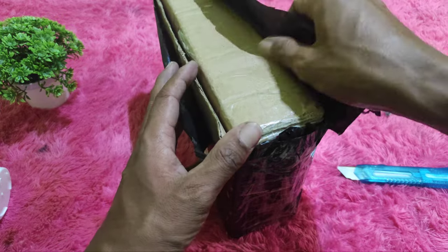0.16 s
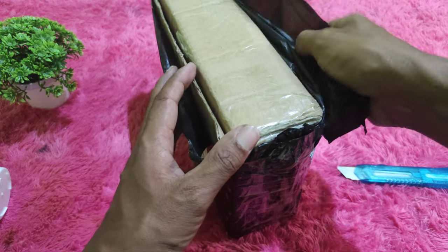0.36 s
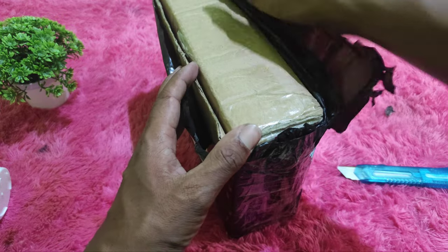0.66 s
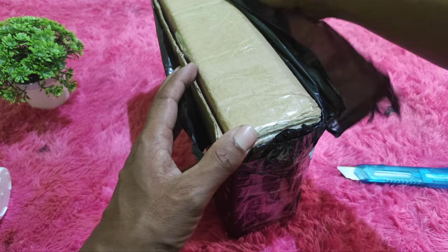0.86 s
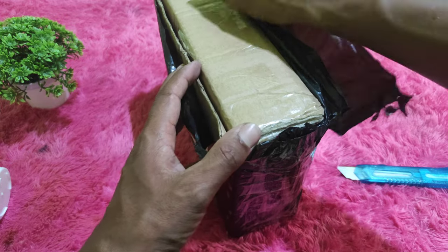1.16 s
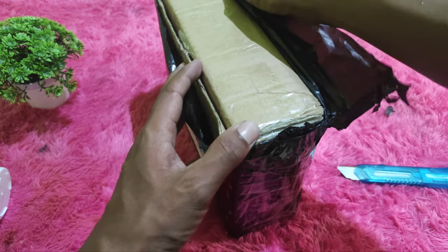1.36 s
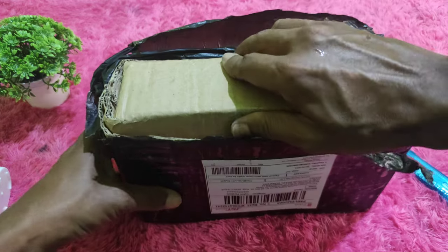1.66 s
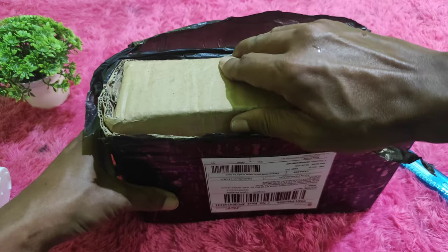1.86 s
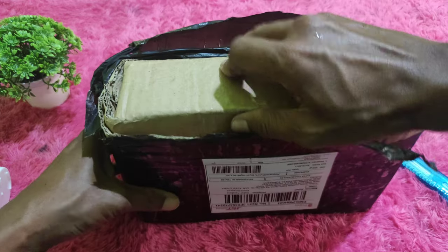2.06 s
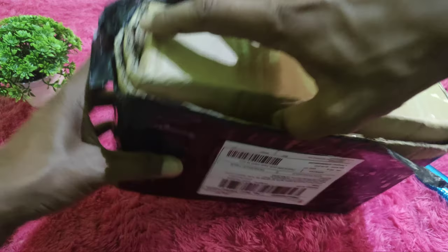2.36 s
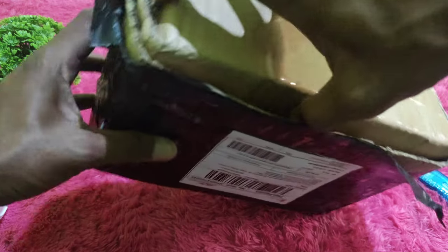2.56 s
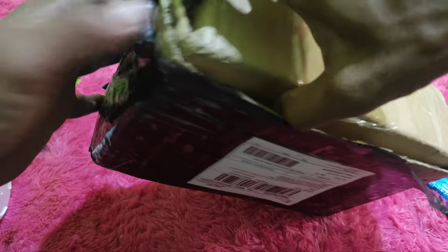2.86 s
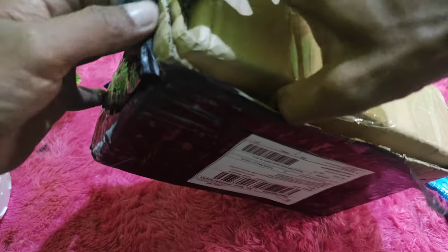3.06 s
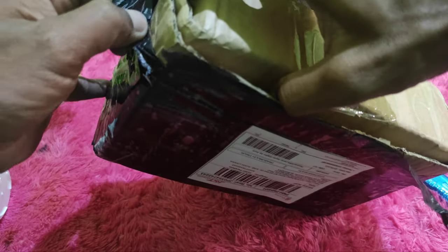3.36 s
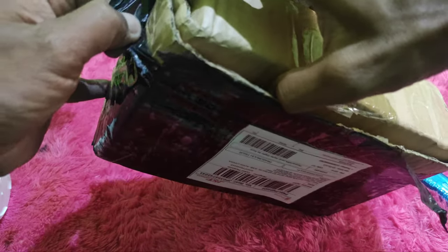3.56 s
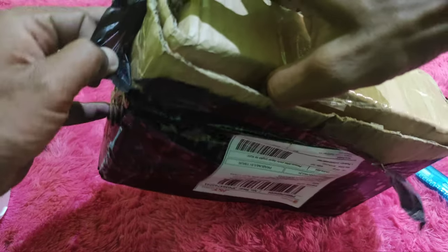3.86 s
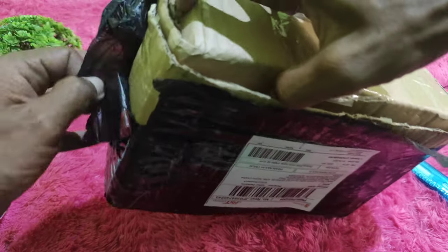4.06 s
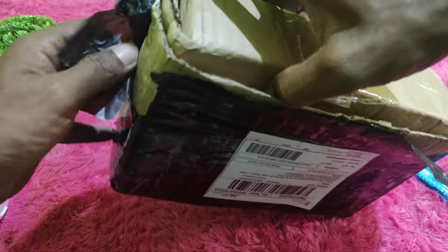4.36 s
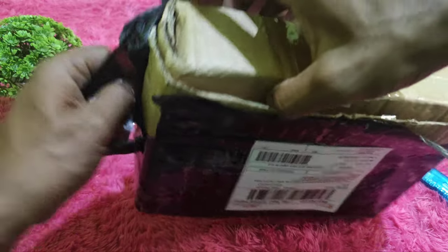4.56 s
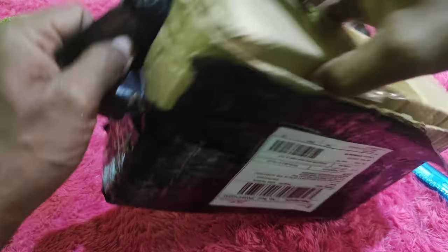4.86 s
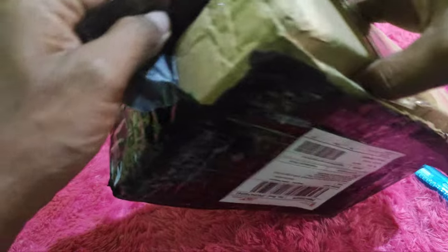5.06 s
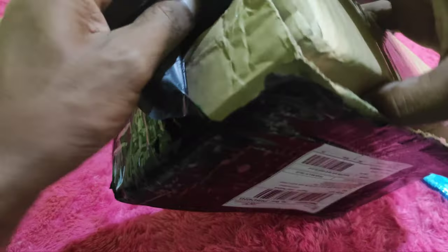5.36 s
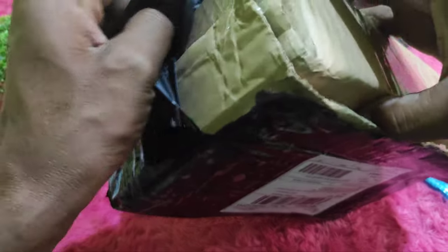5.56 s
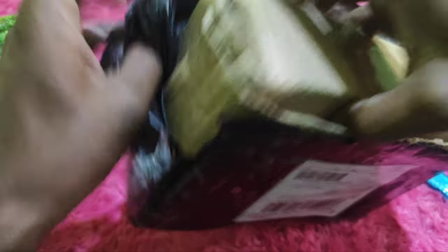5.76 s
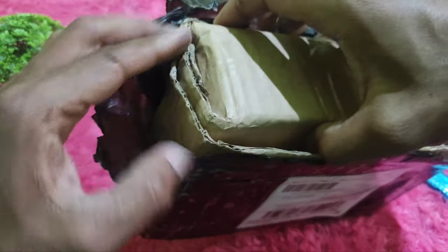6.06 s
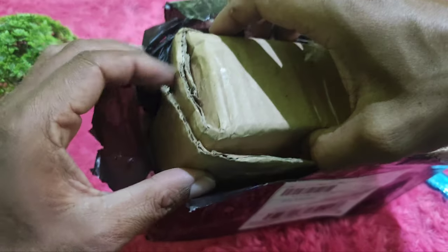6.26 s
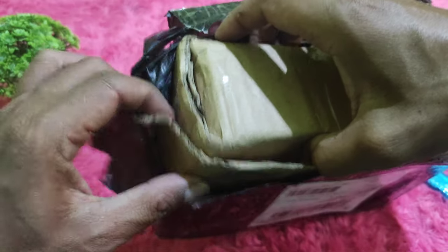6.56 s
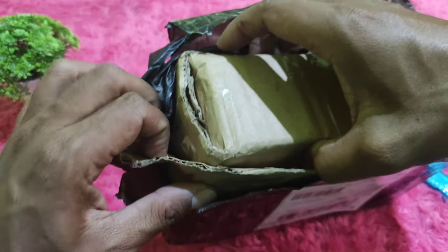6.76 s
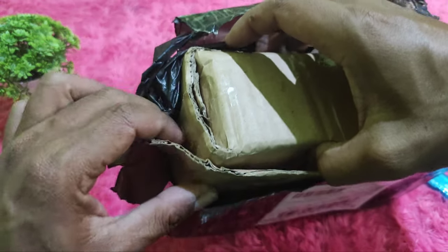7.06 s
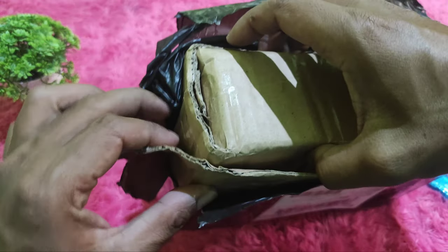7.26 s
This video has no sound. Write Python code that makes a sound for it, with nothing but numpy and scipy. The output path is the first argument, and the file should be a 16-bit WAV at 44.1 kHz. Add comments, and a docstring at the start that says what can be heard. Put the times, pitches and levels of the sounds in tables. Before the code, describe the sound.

Close, bright plastic crackle and loud crease snaps as a parcel is unwrapped, cardboard thumping and rubbing underneath, a faint motor droning far off.

```python
"""In a small room, close to the microphone, hands peel a plastic mailing bag off a taped cardboard box.
The film crackles in swarms of random clicks and single loud snaps, each click or crease shaking the sheet.
The box rumbles as knocks and rubbing fingers ring its low modes; a far motor drones as a few sine waves.
Filtered noise makes the rush of the room. The right microphone port rings in the treble and overloads,
the left one is muffled. The sound drops out briefly once."""
import sys
import numpy as np
from scipy import signal
from scipy.fft import rfft, irfft
from scipy.io import wavfile
from scipy.ndimage import uniform_filter1d

SR = 44100
rng = np.random.default_rng(int(sys.argv[2]) if len(sys.argv) > 2 else 0)


def transcribe(signal):
    """Save signal, clipped to [-1, 1], as a 16-bit WAV file at the path in sys.argv[1]."""
    frames = np.atleast_2d(signal).T
    limited = np.clip(frames, -1, 1)
    pcm = np.round(limited * 32767).astype(np.int16)
    wavfile.write(sys.argv[1], SR, pcm)


N = 326340
TIME = np.arange(N) / SR  # seconds

# All table levels are relative: the functions below add gains of their own.
# room background spectrum: (frequency [Hz], level per Hz [dB])
AIR_SPECTRUM = [(22, 7.5), (45, 4), (90, -3.5), (130, -2.5), (220, -3.5), (400, -5), (800, -10),
                (2000, -17.5), (6000, -20.5), (15000, -51)]
# distant motor: (time [s], firing rate [per s], level [dB], pitch that booms most [Hz])
MOTOR_COURSE = [(0, 26.8, -56.5, 82), (1.4, 31, -48.5, 82), (1.6, 30.3, -38, 71), (2.05, 30.3, -48, 67.6),
                (2.9, 31, -40.5, 90), (3.2, 30, -40.5, 155), (3.8, 28.4, -46, 123), (4.6, 31.5, -45.5, 169),
                (5.1, 31.6, -44.5, 170), (5.7, 31.2, -47.5, 162), (6.15, 31.3, -40.5, 148),
                (6.9, 29.4, -49, 88), (7.4, 26, -46, 88)]
# overtones of the motor: (multiple of the firing rate [-], level [dB])
MOTOR_ORDERS = [(2, 0), (3, -5.5), (4, -18.5), (5, -8.5), (6, -9), (7, -2.5)]
# how hard the holding hand presses, as its rub on the box: (time [s], level [dB])
HAND_GRIP = [(0, -43.5), (1.3, -41.5), (1.8, -39.5), (2.1, -41.5), (2.6, -47), (2.98, -38), (3.3, -50.5),
             (3.72, -53), (3.83, -40.5), (4.4, -46), (5.1, -44), (5.8, -47.5), (6.4, -47.5), (7.4, -48)]
# fingers knocking the box: (time [s], level [dB], pitch stirred most [Hz])
FINGER_KNOCKS = [(0.466, -25, 270), (1.576, -19.5, 242), (1.665, -19.5, 290), (1.775, -23.5, 266),
                 (2.332, -20.5, 302), (2.745, -21.5, 343), (2.879, -25, 320), (2.937, -19.5, 288),
                 (3.001, -19, 290), (3.324, -30, 400), (4.075, -16, 180), (5.652, -24.5, 280),
                 (5.88, -29, 328), (5.96, -24, 300), (6.2, -33, 190), (6.616, -25.5, 355),
                 (6.671, -16, 377), (6.717, -20.5, 340)]
# ringing modes of the box and the air inside: (pitch [Hz], level [dB], time to fade by 60 dB [s])
BOX_MODES = [(176, -6, .1), (204, -7, .08), (245, -1, .14), (277, -2, .15), (299, -4, .12),
             (328, -1.5, .17), (374, -.5, .12), (450, -8, .05), (535, -3, .06), (597, -5, .06)]
# creases that snap through: (time [s], level [dB], pitch of the fold [Hz], fold against crack [dB])
CREASE_SNAPS = [(0.195, -21, 1980, -16), (0.2677, -12, 2600, -9.5), (0.4402, -9, 4300, -32),
                (.455, -16, 4450, -25), (.6537, -12.5, 3780, -20), (0.94, -5, 1080, -25),
                (1.1213, -11.5, 2380, -17), (1.1349, -22.5, 2810, 0), (1.2306, -17, 2130, -12),
                (1.5725, -4.5, 1210, -12.5), (1.631, -7, 3510, -33), (1.6571, -18, 1620, 5),
                (1.6654, -18.5, 2220, 0), (1.7749, -3.5, 1020, -13.5), (2.288, -4, 3870, -28),
                (2.3014, -4, 4540, -25), (2.315, -5, 2710, -26), (2.331, -6, 3520, -15),
                (2.3492, -1.5, 2470, -12), (2.496, -14.5, 2650, -36), (2.583, -13.5, 4440, -31),
                (2.617, -9, 2180, -19), (2.7328, -19.5, 4300, -11), (2.7918, -25.5, 4350, 1),
                (3.1772, -14.5, 2400, -14), (3.191, -17, 2260, -8), (3.208, -26, 2200, -1),
                (3.2571, -12, 3380, -30), (3.264, -19.5, 2400, -6.5), (3.2786, -1.5, 2430, -28),
                (3.3056, -23, 2410, -8), (3.3272, -8.5, 2850, -10.5), (3.3876, -5.5, 3200, -18),
                (3.411, -23, 2380, -6), (3.4602, -19, 4400, -14), (3.594, -20, 3540, -30),
                (4.0612, -1, 2540, -12), (4.0755, -4, 2530, -13), (4.0869, -1, 2130, -5),
                (4.4105, -14, 4470, -28), (4.5344, -34, 2180, 5.5), (4.5531, -22.5, 2560, -6.5),
                (4.6097, -9, 2490, -40), (4.7619, -3, 2580, -10), (4.8529, -9, 2710, -13.5),
                (4.9489, -23.5, 1220, 0.5), (4.966, -10, 1154, -20), (5.1601, -32, 2150, 2.5),
                (5.2169, -27.5, 4450, -7), (5.326, -10, 3200, -12), (5.341, -8, 3730, -22.5),
                (5.3508, -12.5, 3200, -10), (5.443, -12, 3290, -10), (5.478, -7.5, 2430, -17),
                (5.513, -9.5, 2480, -13), (5.528, -14, 4500, -14), (5.551, -4, 3910, -30),
                (5.6226, -22, 3620, 1.5), (5.6337, -13.5, 3050, -15), (5.857, -19.5, 2355, -16),
                (5.878, -9, 1240, -22), (6.046, -8, 4325, -40), (6.209, -16.5, 4340, -16),
                (6.2306, -10, 2996, -26), (6.2429, -10, 2860, -10.5), (6.294, -13, 2780, -24),
                (6.3012, -13, 2670, -29), (6.353, -29, 2290, -3), (6.3971, -9.5, 3630, -30),
                (6.4242, -12, 4500, -32), (6.532, -15.5, 4000, -4.5), (6.5444, -21.5, 3230, -4),
                (6.6691, -6, 2590, -15), (6.7543, -3.5, 3690, -38), (6.7964, -13.5, 2270, -16),
                (6.8312, -11.5, 2240, -30), (6.9428, -8, 2800, -17), (7.195, -22, 1042, -26),
                (7.3222, -13.5, 2600, -33), (7.363, -13, 2300, -21)]
# pulls on the film: (hardest moment [s], crinkle level [dB], build-up [s], let-go [s],
#                     broad folds against crinkle [dB])
FILM_PULLS = [(.04, -30, 0.26, 0.12, -10.5), (.2, -29.5, 0.041, 0.035, -5.5),
              (0.263, -23.5, 0.039, 0.31, -11.5), (0.466, -18, 0.036, 0.027, -15.5),
              (.65, -27.5, 0.082, 0.11, -10), (.94, -22.5, 0.16, 0.051, -11.5),
              (1.127, -32, 0.19, 0.14, -5), (1.343, -23, 0.013, 0.15, -7.5),
              (1.411, -22, 0.025, 0.063, -17), (1.627, -20, .07, 0.088, -8.5),
              (2.3, -23, 0.042, 0.088, -11.5), (2.42, -26.5, 0.05, 0.083, -11.5),
              (2.859, -31.5, 0.14, 0.056, -7), (2.946, -24, 0.032, 0.067, -11),
              (3.188, -28, 0.035, 0.036, -14), (3.271, -35, 0.039, 0.25, -14), (3.5, -45, 0.098, .05, 1),
              (3.832, -22, 0.028, 0.053, -16), (3.96, -34.5, 0.075, 0.075, -7.5),
              (4.085, -17.5, 0.025, 0.02, -10), (4.347, -31, .012, 0.084, -14.5),
              (4.495, -31.5, 0.023, 0.026, -15), (4.56, -36.5, .015, 0.18, -7.5),
              (4.768, -32, 0.0068, 0.11, -7), (4.97, -38.5, 0.035, .05, -6), (5.311, -24, 0.056, .035, -13),
              (5.521, -24, 0.12, 0.17, -13.5), (5.645, -27, 0.08, 0.064, -13),
              (5.746, -28, 0.056, 0.022, -10), (5.876, -16, 0.015, 0.038, -12),
              (5.96, -28, 0.047, 0.081, -11), (6.045, -28.5, 0.062, 0.08, -14),
              (6.238, -24.5, 0.03, .025, -21), (6.3, -30.5, 0.05, 0.029, -16),
              (6.402, -24.5, 0.03, 0.077, -20.5), (6.54, -22.5, 0.052, 0.091, -16),
              (6.669, -21, 0.029, 0.049, -13), (6.758, -24.5, .06, 0.057, -15.5),
              (6.96, -30.5, 0.13, 0.053, -16), (7.025, -31, 0.021, 0.019, -13),
              (7.114, -30, 0.018, .055, -19), (7.253, -32, 0.026, 0.047, -27),
              (7.325, -28, .01, 0.23, -16.5)]
# spectrum of the fine crinkle: (frequency [Hz], level per Hz [dB])
CRINKLE_SPECTRUM = [(1500, -10), (3000, -0.5), (5000, -1.5), (6500, -2), (8400, -4.5), (10200, -4.5),
                    (12000, -19.5), (15000, -13.5)]
# spectrum of the broad folds: (frequency [Hz], level per Hz [dB])
FOLD_SPECTRUM = [(400, 0), (750, -2.5), (1150, 8), (1600, 2), (2400, 9.5), (3400, -8), (5000, -1.5),
                 (9000, -37)]
# resonances of the right microphone port: (pitch [Hz], width [Hz], boost of each alone [dB])
PORT_RESONANCES = [(7487, 160, 7), (7030, 1060, 12), (8170, 760, 9)]
# the drop-out: (time [s], level [dB])
DROPOUT_COURSE = [(1.42, 0), (1.445, -16), (1.49, -48), (1.495, -80), (1.546, -80), (1.549, 0)]

USUAL_GRIP_DB = -41
SLIDE_DB, SLIDE_S = -15.5, 0.084  # a finger slides on after each knock
DRAG_DB = -7  # the folds drag over the box as they move
PULL_ROUNDNESS = 1.35
SETTLE_DB, SETTLE_RISE_S, SETTLE_S = -16.5, 0.015, 0.095  # the film keeps rustling after each pull
SETTLE_FOLDS_DB = 9.5  # and sounds duller as it does
RESTING_DB, RESTING_FOLDS_DB = -42.5, -2.5  # film merely held: its crinkle, its folds against that
SHIVER_T60_S = 0.02  # time for the film's shiver to fade by 60 dB
CUTOFF_HZ = 15350  # almost nothing is heard above this


def from_db(db):
    """Turn decibels into a gain."""
    return 10 ** (np.asarray(db) / 20)


def rms_one(x):
    """Scale to an average strength (rms) of 1."""
    return x / np.sqrt(np.mean(x ** 2) + 1e-20)


def in_time(rows):
    """Read the columns of a time table at every sample."""
    s, *columns = np.transpose(rows)
    return [np.interp(TIME, s, column) for column in columns]


def at_hz(points, hz):
    """Read a spectrum table along a log-frequency axis."""
    table_hz, table_db = np.transpose(points)
    return np.interp(np.log(hz), np.log(table_hz), table_db)


def butter(x, hz, kind, order=2):
    """Keep low, high or middle frequencies with a Butterworth filter."""
    edges_hz = np.clip(hz, 10, 0.47 * SR)
    sos = signal.butter(order, edges_hz, kind, fs=SR, output="sos")
    return signal.sosfilt(sos, x + 1e-18)


def resonance(x, hz, width_hz):
    """Ring at one pitch, with gain 1 on top; a narrower width rings longer."""
    r = np.exp(-np.pi * width_hz / SR)
    feedback = [1, -2 * r * np.cos(2 * np.pi * hz / SR), r * r]
    return signal.lfilter(np.array([1, 0, -1]) * (1 - r * r) / 2, feedback, x + 1e-18)


def drift(rate):
    """Wander by chance with spread 1, taking a new random value `rate` times a second."""
    knots = rng.standard_normal(4000)
    wander = np.interp(TIME * rate, np.arange(len(knots)), knots)
    return wander * np.sqrt(3 / 2)  # joining the knots by lines narrows the spread


def swell(s, rise_s, fall_s, roundness=1.0):
    """Build up to gain 1 at moment s and die away; roundness above 1 blunts the top, shortens the skirts."""
    away = np.maximum((s - TIME) / rise_s, (TIME - s) / fall_s)
    near, gain = away < 12, np.zeros(N)
    gain[near] = np.exp(-away[near] ** roundness)
    return gain


def buckles(per_s, spread_db, top):
    """Random clicks, mostly small, a few large; power is evened over a few hundredths of a second."""
    sizes_db = spread_db * np.minimum(rng.exponential(1, N), top)
    sizes = from_db(sizes_db) * rng.choice([-1, 1], N)
    clicks = sizes * (rng.random(N) < per_s / SR)
    power = np.abs(uniform_filter1d(clicks ** 2, size=1500))
    return clicks / np.sqrt(power + 1e-3)


def background(level_db=-45, apart=0.61):
    """Steady low rush of the room: shaped noise, with a part that differs between the two sides."""
    hz = np.maximum(np.fft.rfftfreq(N, 1 / SR), 1)
    noise = rfft(rng.standard_normal((2, N)))
    mid, side = irfft(noise * from_db(at_hz(AIR_SPECTRUM, hz)), N)
    rush = mid + apart * side * np.array([[1], [-1]])
    return from_db(level_db) * rms_one(butter(rush, 25, "high"))


def motor(boom_db=9, boom_octaves=0.41):
    """Only low multiples of the firing rate come through the walls; they swell near a moving boom pitch."""
    per_s, level_db, boom_hz = in_time(MOTOR_COURSE)
    unsteady_per_s = per_s * (1 + 0.00676 * drift(10))
    turn = 2 * np.pi * np.cumsum(unsteady_per_s) / SR
    out = 0
    for multiple, db in MOTOR_ORDERS:
        k = round(multiple)
        octaves_off = np.log2(k * per_s / boom_hz)
        boom = boom_db * np.exp(-(octaves_off / boom_octaves) ** 2)
        gain = from_db(level_db + db + boom + 2.0 * drift(7.8))
        out = out + gain * np.sin(k * turn + rng.uniform(0, 2 * np.pi))
    return out


def rubbing(folds_db):
    """Strength of the rub on the box: the holding hand, the dragging folds and a slide after each knock."""
    hand = from_db(in_time(HAND_GRIP)[0]) ** 2
    drag = from_db(folds_db + DRAG_DB) ** 2
    slides = sum((from_db(db + SLIDE_DB) * swell(s, 0.018, SLIDE_S)) ** 2 for s, db, _ in FINGER_KNOCKS)
    return np.sqrt(hand + drag + slides)


def box(folds_db, knock_db=-7, octaves=0.83, rub_db=11, fingertip_hz=650):
    """Fingers knock, stick and slip on the cardboard and set its low modes ringing."""
    slips = buckles(500, spread_db=2.0, top=2.1) * rubbing(folds_db)
    s, level_db, stirred_hz = np.transpose(FINGER_KNOCKS)
    at = np.round(s * SR).astype(int)
    rings = 0
    for hz, db, t60 in BOX_MODES:
        width_hz = np.log(1000) / np.pi / t60
        # where a finger lands decides which modes it finds
        reach = np.exp(-(np.log2(hz / stirred_hz) / octaves) ** 2) * rng.choice([-1, 1], len(s))
        blows = np.zeros(N)
        # the last factor makes up for the small start of a narrow resonance
        blows[at] = from_db(level_db + knock_db) * reach * SR / (2 * np.pi * width_hz)
        # a soft fingertip takes the edge off each knock
        drive = butter(blows, fingertip_hz, "low") + from_db(23.0) * slips
        rings = from_db(db) * resonance(drive, hz, width_hz) - rings  # modes alternate in sign
    return rings + from_db(rub_db) * butter(slips, [170, 680], "band")


def snaps(crack_hz=6600, crack_width_hz=4200, fold_width_hz=1200, crack_db=-1, fold_db=13,
          travel_s=0.0004, stutter=0.88, stutter_s=0.00058, shiver=0.65, shiver_s=0.0021):
    """A crease flips: a bright crack and the short ring of its fold, then a stutter and a sheet shiver."""
    size = 1024  # samples per snap
    out, t, hz = np.zeros(N + size), np.arange(size) / SR, np.fft.rfftfreq(size, 1 / SR)
    grains = rng.standard_normal((len(CREASE_SNAPS), 2, size))
    # bending waves carry the highs across the sheet sooner than the lows
    flip = irfft(np.exp(-4j * np.pi * travel_s * np.sqrt(hz * crack_hz)))
    for (s, level_db, fold_hz, fold_rel_db), grain in zip(CREASE_SNAPS, grains):
        stutters = stutter * rms_one(grain[0] * t * np.exp(-2 * t / stutter_s))
        shivers = shiver * rms_one(grain[1] * np.sqrt(t) * np.exp(-t / shiver_s))
        drive = flip + (stutters + shivers) / np.sqrt(size)
        crack = resonance(drive, crack_hz, crack_width_hz)
        fold = resonance(drive, fold_hz, fold_width_hz)
        snap = from_db(crack_db) * crack / np.abs(crack).max()
        snap = snap + from_db(fold_db + fold_rel_db) * fold / np.abs(fold).max()
        at = max(round(s * SR), 0)
        out[at:at + size] += from_db(level_db) * snap
    return out[:N]


def handling():
    """Levels of crinkle and folds [dB]: pulls swell, let go and settle over the rustle of the held film."""
    # powers are added up, hence the squares
    crinkle = from_db(RESTING_DB + in_time(HAND_GRIP)[0] - USUAL_GRIP_DB) ** 2
    folds = crinkle * from_db(RESTING_FOLDS_DB) ** 2
    for s, db, rise_s, fall_s, folds_rel_db in FILM_PULLS:
        pull = (from_db(db) * swell(s, rise_s, fall_s, PULL_ROUNDNESS)) ** 2
        settle = (from_db(db + SETTLE_DB) * swell(s, SETTLE_RISE_S, SETTLE_S)) ** 2
        crinkle = crinkle + pull + settle
        duller = pull + settle * from_db(SETTLE_FOLDS_DB) ** 2
        folds = folds + duller * from_db(folds_rel_db) ** 2
    return 10 * np.log10(crinkle), 10 * np.log10(folds)


def scatter(clicks, t60):
    """Draw each click out into a brief random shiver of the same energy."""
    r = from_db(-120 / (t60 * SR))  # power decay per sample
    power = signal.lfilter([1 - r], [1, -r], clicks ** 2 + 1e-18)
    return np.sqrt(power) * rng.standard_normal(N)


def facets(clicks, spectrum, variety_db=5.0, shiver=1.0):
    """Each buckle shakes facets of many sizes, each with its own strength; the sheet shivers on."""
    edges_hz, at = np.geomspace(350, 17000, num=15), np.flatnonzero(clicks)
    out = 0
    for low, high in zip(edges_hz, edges_hz[1:]):
        strength = from_db(variety_db * np.clip(rng.standard_normal(N)[at], -2, 2))
        blows = np.zeros(N)
        blows[at] = clicks[at] * strength * np.sign(rng.random(N)[at] - 0.5)
        shaken = blows + shiver * scatter(blows, SHIVER_T60_S)
        band_gain = from_db(at_hz(spectrum, np.sqrt(low * high)))
        out = out + band_gain * butter(shaken, [low, high], "band")
    return rms_one(out)


def film(crinkle_db, folds_db, back_share=0.32, front_share=0.053):
    """A harder pull brings more buckles a second; they come in clumps and move the broad folds around them."""
    per_s = 1300 * from_db(0.4 * (crinkle_db + 32.5))
    fine = buckles(per_s, spread_db=2.5, top=2.4) * from_db(1.3 * drift(110))
    # now and then a stiffer wrinkle gives way and stands out of the swarm
    stiff = 21 * rng.uniform(0.39, 1.14, N) * (rng.random(N) < 36 / SR)
    clicks = fine + stiff
    crinkle = from_db(crinkle_db - 3.5) * facets(clicks, CRINKLE_SPECTRUM)
    # the two faces of the sheet radiate unlike patterns
    front = from_db(folds_db + 5.5) * facets(clicks, FOLD_SPECTRUM)
    back = from_db(folds_db + 5.5) * facets(clicks, FOLD_SPECTRUM)
    left = 0.85 * crinkle + back_share * back + front_share * front
    return np.array([left, crinkle + front])


def room(x, room_db=-15, t60=0.39):
    """Echoes off the walls: a short tail of fading noise, different at each port."""
    t = np.arange(SR // 2) / SR
    fading = rng.standard_normal((2, len(t))) * from_db(-60 * t / t60) * (t > 0.004)
    tail = rms_one(fading) / np.sqrt(len(t))
    return x + from_db(room_db) * signal.fftconvolve(x, tail, axes=1)[:, :N]


def scene():
    """The parcel with its room echo, over the motor and the background; gain pairs are left, right."""
    crinkle_db, folds_db = handling()
    parcel = film(crinkle_db, folds_db)
    parcel = parcel + snaps() * from_db([[-5], [1]])
    parcel = parcel + box(folds_db) * from_db([[-2], [0]])
    far = motor() * from_db([[-4], [-2]]) + background() * from_db([[-1], [1]])
    return room(parcel) + far


def record(dry, muffle_hz=300, muffle_top_hz=2700, left_db=6.0, leak_db=-30):
    """Muffle the left port, ring the right, flatten peaks that overload, drop out once, cut the top."""
    muffled = butter(butter(dry[0], muffle_hz, "low", order=1), muffle_top_hz, "low", order=4)
    left = from_db(left_db) * muffled + from_db(leak_db) * dry[0]  # a little leaks in unmuffled
    right = dry[1]
    for hz, width_hz, db in PORT_RESONANCES:
        right = right + (from_db(db) - 1) * resonance(right, hz, width_hz)
    both = np.clip([left, right], -0.9, 0.9)
    both = both * from_db(in_time(DROPOUT_COURSE)[0])
    top_cut = signal.ellip(10, 0.2, 70, CUTOFF_HZ, fs=SR, output="sos")
    return signal.sosfilt(top_cut, both)


dry = scene()
out = record(dry)
transcribe(out)
```